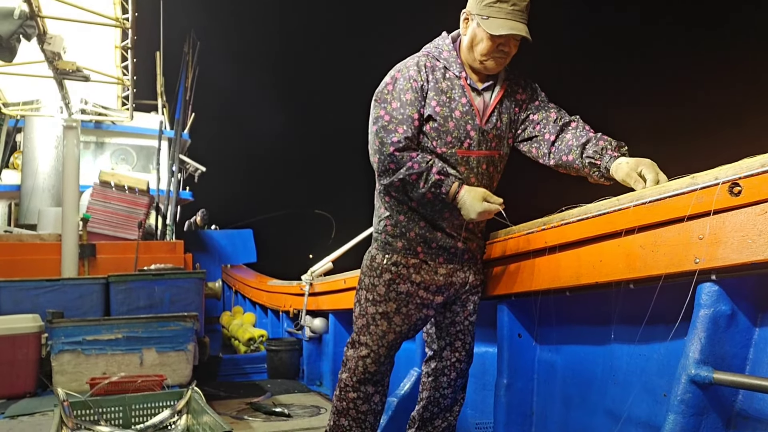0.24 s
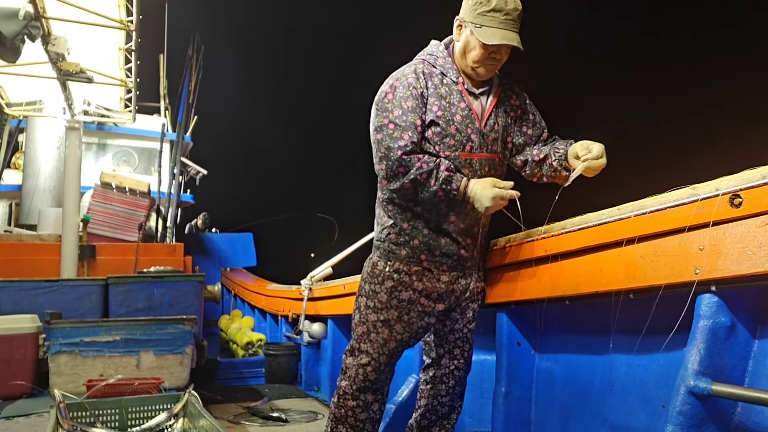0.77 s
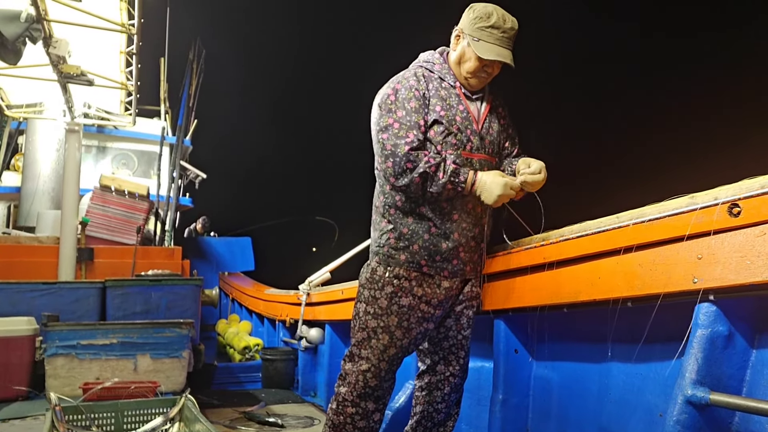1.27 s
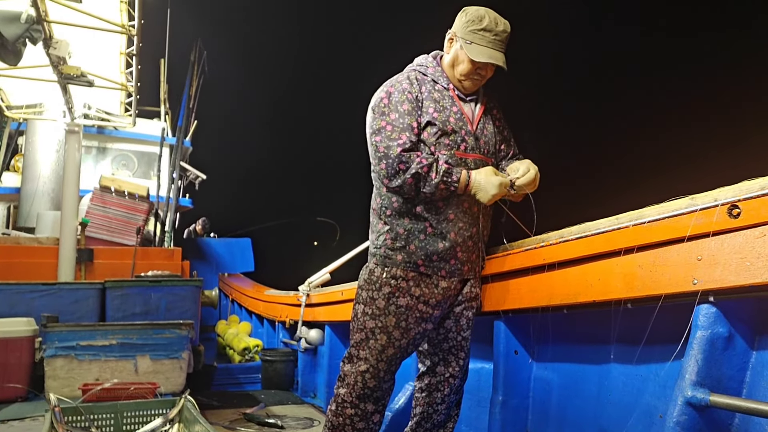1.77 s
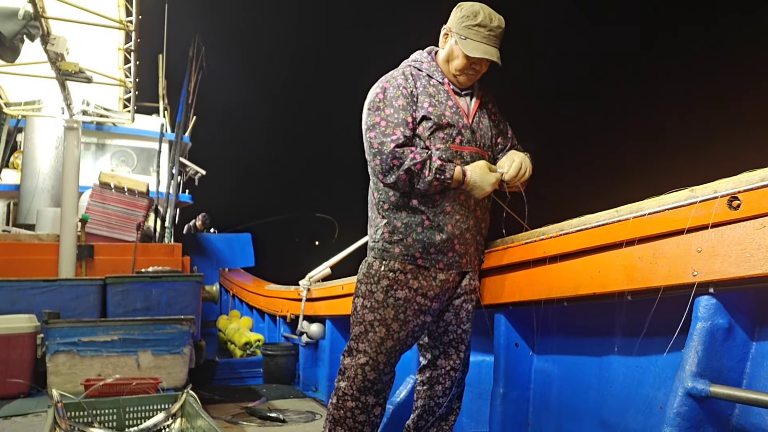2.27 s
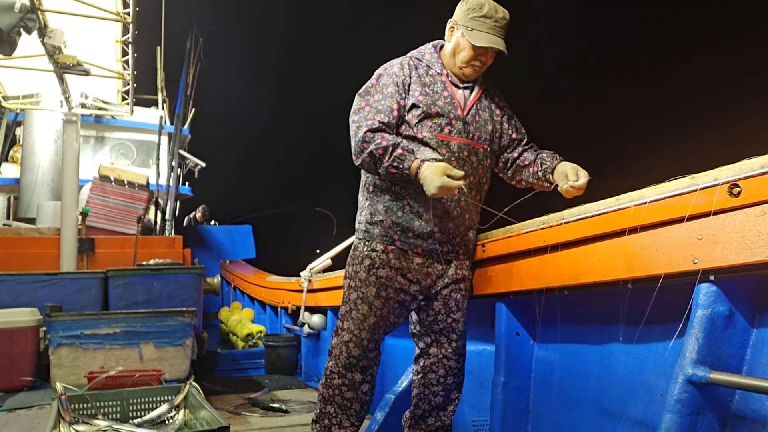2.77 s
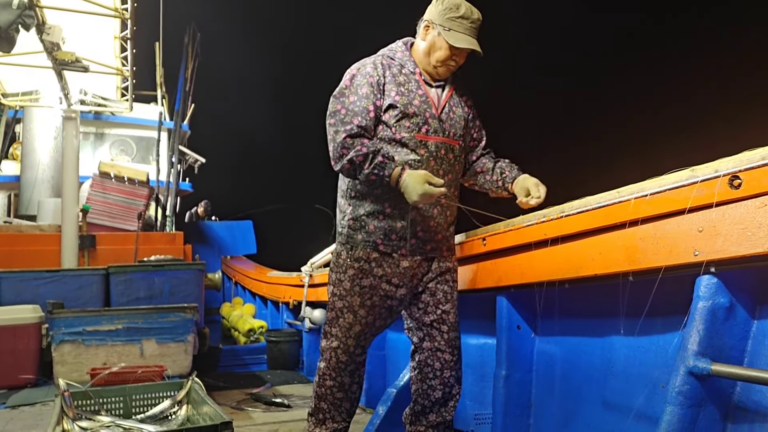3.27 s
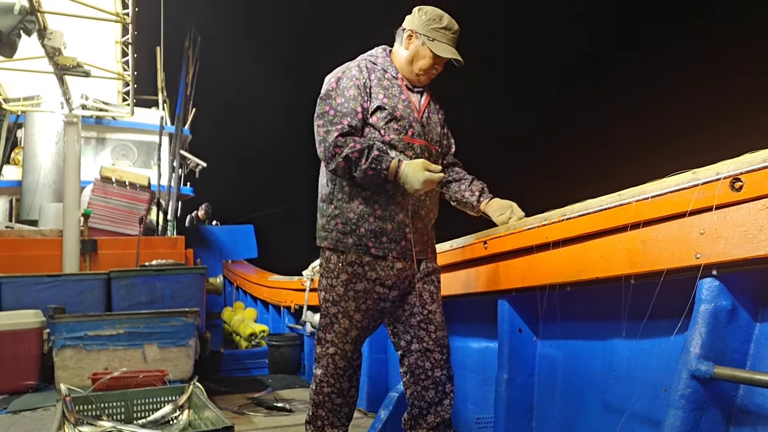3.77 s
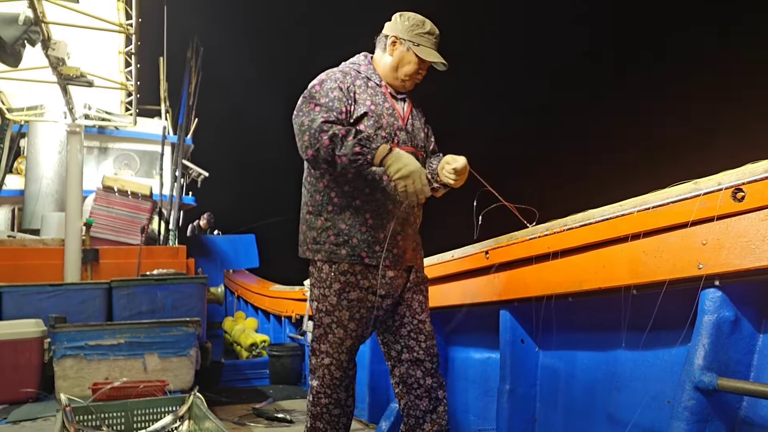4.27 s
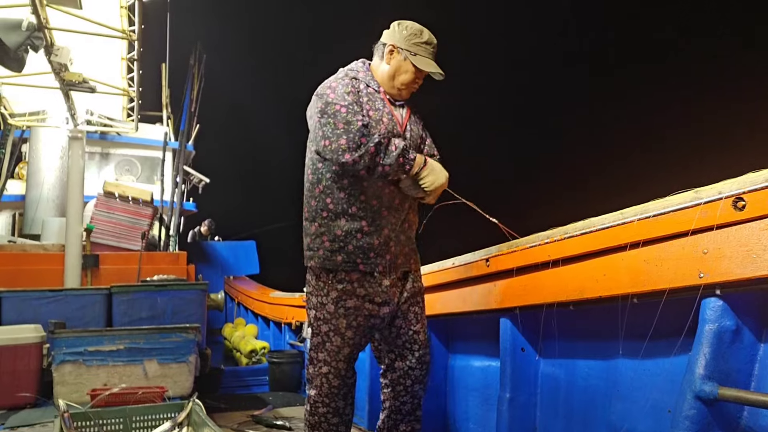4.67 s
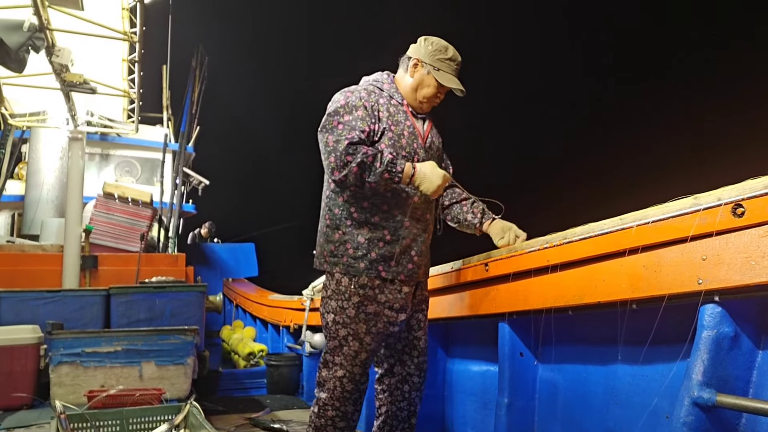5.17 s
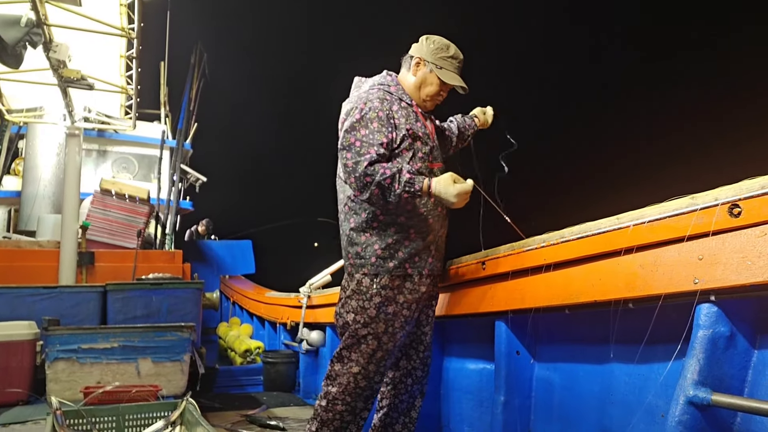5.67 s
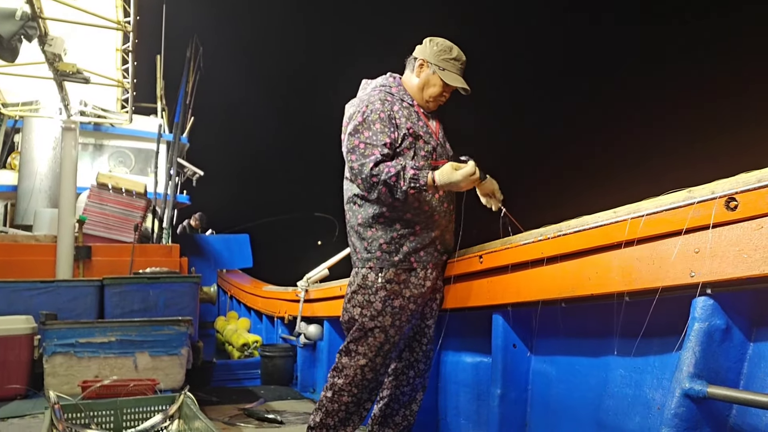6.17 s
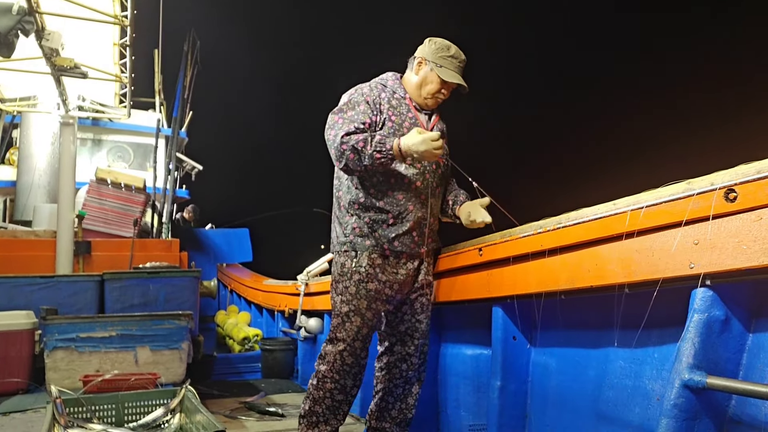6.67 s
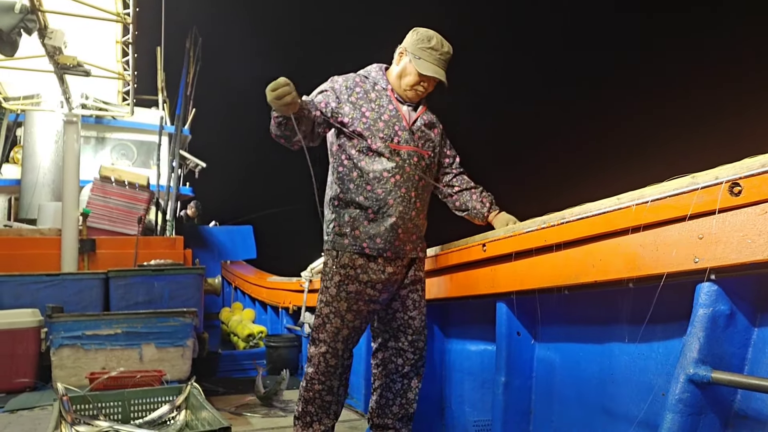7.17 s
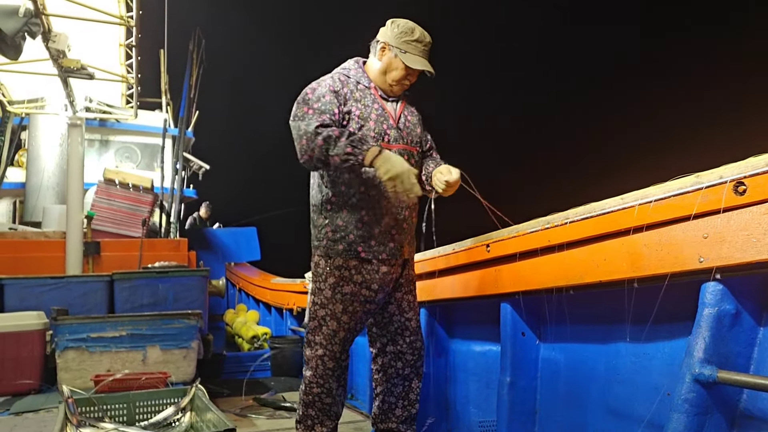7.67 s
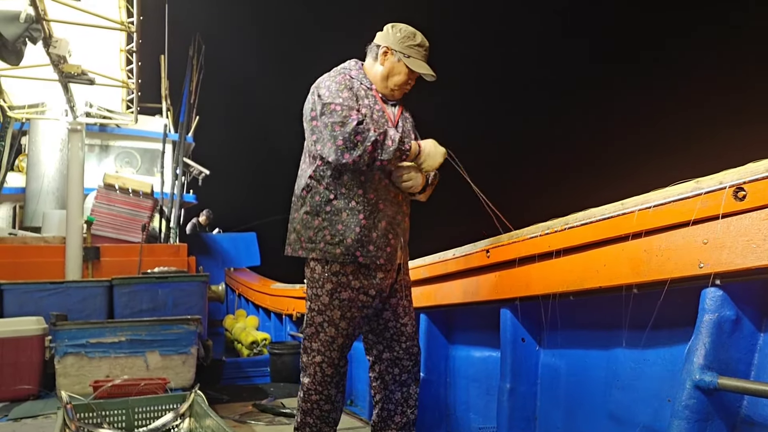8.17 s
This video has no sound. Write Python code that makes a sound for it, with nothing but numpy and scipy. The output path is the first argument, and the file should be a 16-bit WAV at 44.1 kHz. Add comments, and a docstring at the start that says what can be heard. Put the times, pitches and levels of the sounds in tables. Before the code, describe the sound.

From 0 to about 8.4 seconds a six-cylinder boat diesel runs continuously, already going at the start and still going at the end. Its speed is practically constant, about eleven and a half cycles per second, with some sixty-nine firings a second fusing into a deep, grainy throb. Low hum and wavering rumble carry most of the weight, joined by a resonant deck drone in the lower midrange. Gears knock in a rapid repeating pattern; above them lie light valve clatter, thin ringing metal and faint hiss. The firing note strengthens around 2 seconds, then varies mildly. A low hull tone near ninety hertz swells slowly around 4.3 seconds and recedes. Many layers lift slightly near 1, 4.6 and 8.3 seconds as the boat rolls. Stereo microphone on an open deck at night; the man handling line is inaudible.

```python
"""On the deck of a boat a six-cylinder diesel runs steadily, heard by a two-port microphone.
Crank and propeller shaft hum through the hull as sines locked to the engine cycle; generator and pump add mains tones.
Gears knock in a pattern that repeats each cycle; firings swell noise into deck drone, gear noise and valve clatter.
Struck metal parts ring on, while low rumble and hiss waver by chance.
Many layers, though not the rumble or the knock, rise and fall with the boat's slow roll."""
import sys
import numpy as np
from scipy import signal
from scipy.fft import rfft, irfft, next_fast_len
from scipy.io import wavfile
from scipy.ndimage import uniform_filter1d, map_coordinates

SR = 44100
rng = np.random.default_rng(int(sys.argv[2]) if len(sys.argv) > 2 else 0)


def generate_wav(signal):
    """Clip the signal to [-1, 1] and save it as 16-bit WAV at the path in sys.argv[1]."""
    frames = np.transpose(np.atleast_2d(signal))
    scaled = np.clip(frames, -1, 1) * 32767
    pcm = np.round(scaled).astype(np.int16)
    wavfile.write(sys.argv[1], SR, pcm)


def level_to_linear(level):
    """Convert decibel levels to linear amplitude factors, elementwise."""
    exponent = np.asarray(level, float) / 20
    return 10 ** exponent


N = 371763  # length in samples

# Engine speed. Each row: time in seconds, full engine cycles per second.
ENGINE_SPEED = [(0, 11.539), (1, 11.536), (2, 11.527), (3.5, 11.53), (5, 11.517), (6, 11.506), (7, 11.5),
                (8.43, 11.501)]
# Tones locked to the engine cycle. Each row: multiple of the cycle rate, usual level in dB, left minus right in dB.
CRANK_ORDERS = [(4, -43, 2), (5, -40, 1), (6, -28, 0), (7, -39, -2), (8, -37, -2), (9, -37, 0),
                (10, -43, -2), (11, -43, 1), (12, -38, -3), (13, -37, 0), (14, -49, -8), (15, -32, -2),
                (16, -52, 13), (17, -49, -3), (18, -41, -2), (19, -56, 1), (20, -49, -1), (21, -49, -2),
                (22, -54, -6), (23, -47, 3), (24, -58, -1), (25, -55, 0), (26, -47, -3), (27, -58, -1),
                (28, -54, 3), (29, -61, 5), (30, -57, 10), (31, -54, -1), (32, -48, 1), (33, -62, 11),
                (34, -56, 3), (35, -61, 4), (36, -54, 3), (38, -57, 2), (39, -49, 3), (40, -45, 5),
                (41, -52, 5), (42, -47, 3), (43, -53, 3), (44, -47, 3), (45, -52, 3), (46, -48, 7),
                (47, -48, 5), (48, -51, 2), (49, -54, -5), (51, -55, 0), (53, -59, 0), (55, -60, 2),
                (56, -60, -3), (58, -55, 4), (59, -63, 4), (60, -57, 2), (61, -59, 6), (62, -61, 1),
                (63, -61, -2), (65, -64, -4), (66, -64, 0), (73, -68, 0), (75, -66, 4), (78, -72, 0),
                (79, -71, 1), (80, -76, 0), (81, -71, -5), (84, -69, -5), (85, -66, 4), (87, -66, 9),
                (91, -68, 4), (92, -69, 2), (107, -71, 3), (120, -71, 0)]
# Tones of the propeller shaft, which turns once in three engine cycles.
# Each row: multiple of the shaft rate, level in dB before any swell, left minus right in dB.
SHAFT_ORDERS = [(13, -55, 2), (14, -49, 2), (22, -52, -1), (23, -38, -2), (25, -42, -1), (29, -57, 0),
                (43, -54, 0), (52, -52, -2), (68, -57, 2), (70, -55, 1), (76, -55, -2), (94, -57, 2)]
# When each part of the exhaust pulse reaches the deck. Each row: multiple of the cycle rate, moment in cycles.
PULSE_ARRIVAL = [(4.5, .865), (5.5, 1.0), (6.5, 1.265), (7.5, .735), (9.5, .725), (12.5, .58), (14.5, .6),
                 (15.5, .82), (38, .8), (41, .74), (46, .98)]
# Generator and pump tones. Each row: frequency in Hz, usual level in dB.
MAINS_TONES = [(30, -53), (60.8, -44), (71, -48), (90, -48), (100.3, -53), (120.1, -46)]
# Hull panels that load and unload with the roll; a row whose limits are reversed lifts no tone.
# Each row: lower limit in Hz, upper limit in Hz, swing in dB for a usual roll, lag behind the crest in rolls,
# drift in dB per second.
HULL_PANELS = [(90, 89, 3, .2, -.3), (95, 97, 1.5, -0.018, -0.6), (132, 144, 3.5, 0.14, 0.5),
               (167, 180, 1.26, -0.07, 0), (204, 250, 0.5, 0.084, 0.37)]
# Ringing metal parts. Each row: frequency in Hz, resonance width in Hz, left level in dB, right level in dB,
# moment of the blow as a share of a cycle; levels are those before the roll.
RINGING_PARTS = [(1790, 35, -66, -62, .55), (1870, 35, -68, -66, .6), (1970, 55, -62, -63, .55),
                 (2098, 25, -63, -71, .6), (2290, 30, -76, -71, .75), (2460, 40, -68, -74, .7),
                 (2690, 35, -70, -66, .75), (2905, 35, -67, -72, .7), (3240, 30, -68, -74, .8),
                 (3300, 45, -72, -66, .75), (3480, 35, -62.5, -62.5, .72), (4010, 40, -69, -76, .8),
                 (4230, 40, -71, -72, .75), (4970, 40, -74, -73, .8), (5420, 40, -75, -80, .75),
                 (6460, 45, -73, -81, .8), (7340, 40, -77, -84, .7), (7670, 40, -77, -81, .75),
                 (8700, 40, -83, -81, .8)]
# Strength of each cylinder's blow, in firing order.
# Each row: relative power on the deck, on the gears, on the valve gear.
CYLINDER_BLOWS = [(1.6, 0.9, 0.95), (0.99, 0.94, 0.87), (1.65, 0.67, 1.12), (0.93, 1.4, 1.03),
                  (1.7, 0.93, 1.44), (0.99, 1.3, 0.89)]
# Colours of the noises before each layer's trim. Each row: frequency in Hz, level in dB per Hz, left minus right in dB.
RUMBLE_COLOUR = [(22, -73.1, 2), (39.2, -73, 3.7), (59, -51.5, 3), (85.5, -59.5, -3.3), (110, -66, 9),
                 (175, -52.5, 3.5), (184, -67, 13), (222, -66, 11), (231, -60.5, 1), (307, -61.5, -2),
                 (304, -72.5, 14), (373, -63.5, 2.5), (413, -78, 8), (435, -64, 2)]
DRONE_COLOUR = [(410, -96, 3), (451.4, -73, 10), (445, -56, 10.5), (498, -54, 2), (549, -53, 3.0),
                (580.5, -64, 1), (633, -63, 0.5), (715, -63, 9), (738, -69.5, -7), (790, -64.5, 3),
                (783, -74, 13), (881, -76.5, -8), (912, -92.5, -16), (938, -76.5, -16)]
GEAR_COLOUR = [(935, -100, 5), (968, -88, 6), (1037, -74.5, 6.5), (1150, -84, 3), (1190, -78.5, 1.5),
               (1460, -82, 0), (1790, -82, 1), (1815, -77, 1), (1913, -82.5, -0.5), (1945, -80, -14.5),
               (2044, -88, 15), (2106, -84, 17.5), (2230, -95, -6), (2400, -100, -2)]
CLATTER_COLOUR = [(2120, -100, 0), (2230, -94.5, -6), (2480, -88.5, 1), (2940, -86, 6), (3100, -89, -5),
                  (3480, -87, 1), (3850, -90.5, 8), (4200, -88, 0), (5160, -91, 3.5), (5610, -96.5, 4),
                  (6550, -110, 3)]
HISS_COLOUR = [(4830, -110, 2), (5820, -100, 6), (6100, -93.5, 1.5), (7670, -94, 6.5), (8670, -97, -1),
               (9850, -102, 3), (12900, -97.5, -1), (15800, -102.5, -3)]
# The two microphone ports. Each row: frequency in Hz, likeness from 0 to 1, lead of the left port in radians.
MIC_PORTS = [(40, 0.76, 0.13), (131, 0.88, 0.45), (206, 1, 0.15), (268, 0.54, 1.23), (310, 0.46, 0.04),
             (476, 1, 0.85), (720, 0.86, 0.43), (783, 0.56, 2), (940, 0.38, 2), (1250, 0.67, 2),
             (1760, 0.49, 3.5), (2120, 0.17, 0.4), (2820, 0, -3.5), (3500, 0.09, 0.74), (4200, 0, 0.5),
             (8000, 0.14, 2)]
# The boat rolls on a slow swell. Each row: moment of the crest in seconds, size of the roll against the usual.
ROLL_CRESTS = [(-2.6, 1), (1.15, 1.05), (4.6, .8), (8.3, 1.6), (12, 1)]
# Rise and fall of the firing note, heard around its mean. Each row: time in seconds, strength in dB.
FIRING_NOTE_STRENGTH = [(0.2, -30.5), (1.55, -29.5), (1.94, -23), (2.46, -28.5), (2.91, -26), (3.25, -31.5),
                        (3.61, -28), (5.5, -28.5), (5.77, -25.5), (7.89, -31.5), (8.3, -26.5)]

SECONDS = np.arange(N) / SR
COARSE = np.arange(0, N + 64, 64)  # every 64th sample, enough for slow curves
CYCLE_HZ = ENGINE_SPEED[0][1]  # cycle rate at the start


def unit(x):
    """Scales a signal to rms 1."""
    return x / np.sqrt(np.mean(x ** 2) + 1e-20)


def along(points, hz, column):
    """Reads one column of a table on a log frequency axis."""
    table = np.array(points, float)
    return np.interp(np.log(hz + 1), np.log(table[:, 0] + 1), table[:, column])


def over_time(rows):
    """Draws the second column of a table as a curve over the seconds in the first."""
    s, values = np.transpose(rows)
    return np.interp(SECONDS, s, values)


def wobble(rate):
    """A smooth random curve with rate knots per second."""
    knots = rng.standard_normal(int(N * rate / SR) + 5)
    return np.interp(np.arange(N), COARSE, map_coordinates(knots, [COARSE * rate / SR]))


def rolled(swing_db, lag, drift_db=0, waver_db=0):
    """Level in dB that peaks once a roll, lag rolls after the crest, drifts per second and wavers by chance."""
    s, size = np.transpose(ROLL_CRESTS)
    roll = np.interp(SECONDS, s, np.arange(len(s)))
    swing = np.interp(SECONDS, s, size) * np.cos(2 * np.pi * (roll - lag))
    return swing_db * swing + drift_db * (SECONDS - SECONDS.mean()) + waver_db * wobble(3.46)


def tone(turns, hz, db, pan_db, waver_db):
    """A sine at both ports, slightly unsteady in phase and level; db is its rms level."""
    spin = np.exp(1j * (2 * np.pi * turns + 0.11 * wobble(1.564)))
    port = level_to_linear(pan_db / 2) * np.exp(.5j * along(MIC_PORTS, hz, column=2))
    level = np.sqrt(2) * level_to_linear(db + waver_db * wobble(1.56))
    return level * np.array([(spin * port).imag, (spin / port).imag])


def shaken(colour, envelope, ripple_db=0):
    """Noise under an envelope, coloured afterwards so that resonances ring on, partly shared by the ports."""
    size = next_fast_len(N + 8192)
    hz = np.fft.rfftfreq(size, 1 / SR)
    shared, left, right = rfft(unit(envelope) * rng.standard_normal((3, N)), size)
    alike = np.clip(along(MIC_PORTS, hz, column=1), 0, 1)
    lead = np.exp(.5j * along(MIC_PORTS, hz, column=2))
    in_band = (hz > colour[0][0]) * (hz < colour[-1][0])
    level = level_to_linear(along(colour, hz, column=1)) * in_band
    pan = level_to_linear(along(colour, hz, column=2) / 2)
    pair = np.sqrt(alike) * shared * [lead, lead.conj()] + np.sqrt(1 - alike) * np.array([left, right])
    # echoes off deck and rail leave each port a fine ripple of peaks and dips, smoothed over 35 Hz
    ripple = uniform_filter1d(rng.standard_normal(pair.shape), int(35 / hz[1]), axis=1)
    pair *= level_to_linear(ripple_db * unit(ripple))
    return irfft(pair * level * [pan, 1 / pan], size)[:, :N] * np.sqrt(SR / 2)


def blows(cycle, part, depth, scatter_db):
    """Envelope with one swell per firing, its power sized by cylinder and a little by chance."""
    firing = 6 * (cycle - 0.004) + 6  # the first firing falls 0.004 of a cycle in
    count = np.arange(int(firing[-1]) + 2)
    chance = 10 ** (scatter_db * rng.standard_normal(len(count)) / 10)
    sizes = np.array(CYLINDER_BLOWS)[count % 6, part] * chance
    swell = 1 + np.clip(depth, 0, 1) * np.cos(2 * np.pi * firing)
    return np.sqrt(np.abs(np.interp(firing, count, sizes)) * swell)


def crank_hum(cycle, panel_lift):
    """Crank orders below 64 as sines, timed by the arriving exhaust pulse; order 6 is the firing note."""
    out = np.zeros((2, N))
    note_db = over_time(FIRING_NOTE_STRENGTH)
    for order, db, pan_db in CRANK_ORDERS:
        if order >= 64:  # these belong to the gear knock
            continue
        # delays add up to a phase lag
        late = np.interp(np.arange(4.5, order), *np.transpose(PULSE_ARRIVAL)).sum()
        # these come by many paths through the hull, out of step
        scattered = 18 < order < 39 or order > 48
        turns = order * cycle - late - .107 + scattered * rng.random()
        if order == 6:
            db = db + note_db - note_db.mean()
        hz = order * CYCLE_HZ
        out += tone(turns, hz, db + panel_lift(hz), pan_db, waver_db=0.44)
    return out


def shaft_hum(cycle, panel_lift):
    """Sines of the propeller shaft, at multiples of a third of the cycle rate; one tone swells once, slowly."""
    out = np.zeros((2, N))
    peak_s, width_s, swell_db = 4.33, 1.6, 13
    bump = np.exp(-.5 * ((SECONDS - peak_s) / width_s) ** 2)
    for order, db, pan_db in SHAFT_ORDERS:
        hz = order * CYCLE_HZ / 3
        if order == 23:  # the strongest
            db = db + swell_db * (bump - .75)
        out += tone(order * cycle / 3 + rng.random(), hz, db + panel_lift(hz), pan_db, waver_db=1.0)
    return out


def mains_tones():
    """Generator and pump as sines of fixed pitch, equally loud at both ports, slowly unsteady."""
    out = np.zeros((2, N))
    for hz, db in MAINS_TONES:
        out += tone(hz * SECONDS + rng.random(), hz, db, pan_db=0, waver_db=1.5)
    return out


def hum(cycle):
    """Clean tones; those of crank and shaft are lifted while a hull panel near their pitch swells."""
    swells = [(lo, hi, rolled(*rule)) for lo, hi, *rule in HULL_PANELS]

    def panel_lift(hz):
        """Sums in dB the swells of the panels whose range holds this pitch."""
        return sum(swell_db for lo, hi, swell_db in swells if lo < hz < hi)

    return crank_hum(cycle, panel_lift) + shaft_hum(cycle, panel_lift) + mains_tones()


def gear_knock(cycle):
    """The gear sound that repeats exactly each cycle: a comb of weak, uneven lines and some strong ones."""
    points = 4096  # per cycle
    hz = np.arange(points // 2 + 1) * CYCLE_HZ
    tilt_db = 7 - 3.9 * np.log2(np.maximum(hz, 1) / 900)
    db = along(GEAR_COLOUR, hz, column=1) + tilt_db + 4.1 * rng.standard_normal((2, len(hz)))
    for order, level_db, pan_db in CRANK_ORDERS:
        db[:, int(order)] = level_db + pan_db / 2, level_db - pan_db / 2
    phases = np.exp(2j * np.pi * rng.random((2, len(hz))))
    lines = level_to_linear(db) * (hz > 730) * (hz < 2200) * phases
    shapes = irfft(lines) * 2896  # one cycle for each port, line levels as rms
    return np.array([np.interp(cycle % 1 * points, np.arange(points), s, period=points) for s in shapes])


def rumble():
    """Low noise whose level wavers slowly by chance."""
    return level_to_linear(-1.36) * shaken(RUMBLE_COLOUR, level_to_linear(2.0 * wobble(2.44)))


def deck_drone(cycle):
    """Deck resonances shaken strongly by each firing, following the roll."""
    roll_db = rolled(swing_db=0.76, lag=0.088, drift_db=0.014, waver_db=1)
    return level_to_linear(-1.48 + roll_db) * shaken(DRONE_COLOUR, blows(cycle, part=0, depth=0.6, scatter_db=0.75))


def gear_noise(cycle):
    """Rough gear noise that swells a little at each firing and follows the roll."""
    roll_db = rolled(swing_db=1.0, lag=0, drift_db=-.05, waver_db=.5)
    envelope = blows(cycle, part=1, depth=.2, scatter_db=1.25)
    return level_to_linear(-1.96 + roll_db) * shaken(GEAR_COLOUR, envelope, ripple_db=1.5)


def rings(cycle, scatter_db=4.0, steady=0.72):
    """Metal parts as noise-fed resonators, rattled once a cycle with a new strength, that ring on."""
    out = np.zeros((2, N))
    whine_db = rolled(swing_db=2, lag=0.14, drift_db=1.1, waver_db=1)
    for hz, width_hz, left_db, right_db, when in RINGING_PARTS:
        beat = np.interp(COARSE, np.arange(N), cycle) - when + 1.5  # the blow falls halfway between whole beats
        size = level_to_linear(scatter_db * rng.standard_normal(int(beat[-1]) + 1))[beat.astype(int)]
        rattle = steady + size * np.sin(np.pi * beat) ** 4
        a, b = rng.standard_normal((2, len(COARSE)))
        decay = np.exp(-np.pi * width_hz * 64 / SR)  # per coarse step
        slow = signal.lfilter([1], [1, -decay], rattle * (a + 1j * b))
        envelope = np.interp(np.arange(N), COARSE, slow.real) + 1j * np.interp(np.arange(N), COARSE, slow.imag)
        ring = envelope * np.exp(2j * np.pi * hz * SECONDS)
        lead = np.exp(1j * (along(MIC_PORTS, hz, column=2) + 0.7 * rng.standard_normal()))
        pair = np.array([level_to_linear(left_db) * unit((ring * lead).real), level_to_linear(right_db) * unit(ring.real)])
        if 1900 < hz < 2050:  # this part belongs to the gears and has an extra roll of its own
            pair = pair * level_to_linear(whine_db)
        out += pair
    return out


def valve_clatter(cycle):
    """Valve-gear noise shaken lightly by each firing, with the ringing parts, both following the roll."""
    roll_db = rolled(swing_db=.45, lag=0.1, drift_db=-0.061, waver_db=0.0027)
    noise = shaken(CLATTER_COLOUR, blows(cycle, part=2, depth=0.11, scatter_db=1.0), ripple_db=2.6)
    return level_to_linear(0.1 + roll_db) * (noise + rings(cycle))


def hiss():
    """Treble noise that wavers by chance at two speeds and follows the roll."""
    roll_db = rolled(swing_db=0.69, lag=0.058, drift_db=-0.15, waver_db=.4)
    envelope = level_to_linear(0.58 * wobble(3.1) + 0.36 * wobble(8))
    return level_to_linear(-1.45 + roll_db) * shaken(HISS_COLOUR, envelope, ripple_db=1.95)


def scene():
    """Sums tones, knock and noises, the engine's parts all turned by one running count of cycles."""
    cycle = np.cumsum(over_time(ENGINE_SPEED)) / SR
    tones = hum(cycle) + gear_knock(cycle)
    low = rumble() + deck_drone(cycle)
    high = gear_noise(cycle) + valve_clatter(cycle) + hiss()
    return tones + low + high


def low_pass(x):
    """Removes everything above the highest recorded frequency."""
    return signal.sosfilt(signal.butter(12, 15670, fs=SR, output="sos"), x)


def record(dry):
    """Keeps only what lies below 15.7 kHz, cut off sharply."""
    spectrum = rfft(dry) * (np.fft.rfftfreq(N, 1 / SR) < 15700)
    mix = irfft(spectrum, N)
    return low_pass(mix)


dry = scene()
out = record(dry)
generate_wav(out)
```